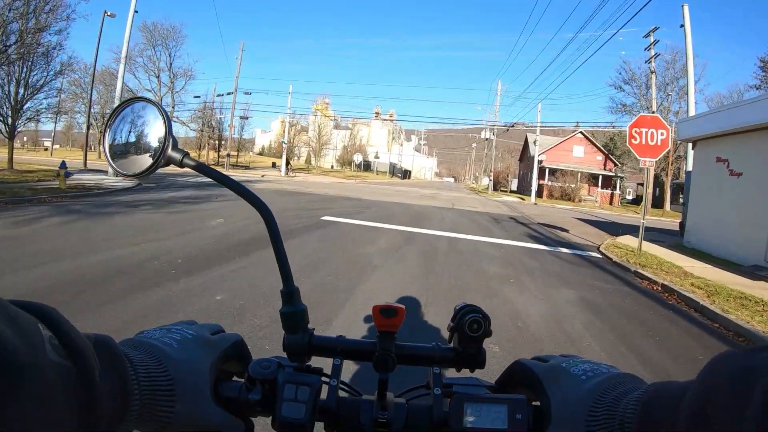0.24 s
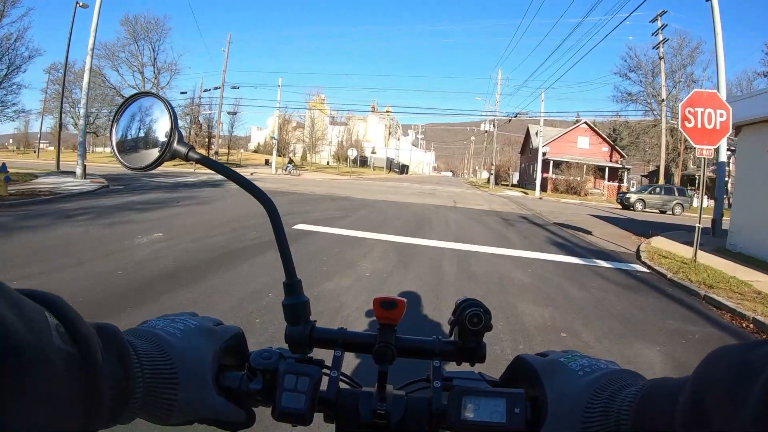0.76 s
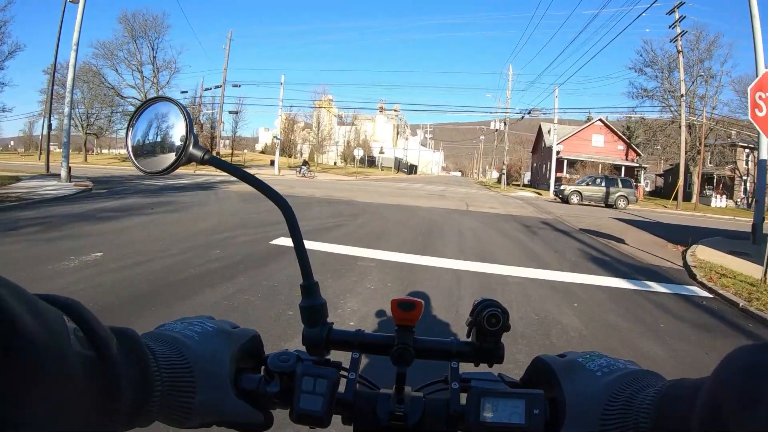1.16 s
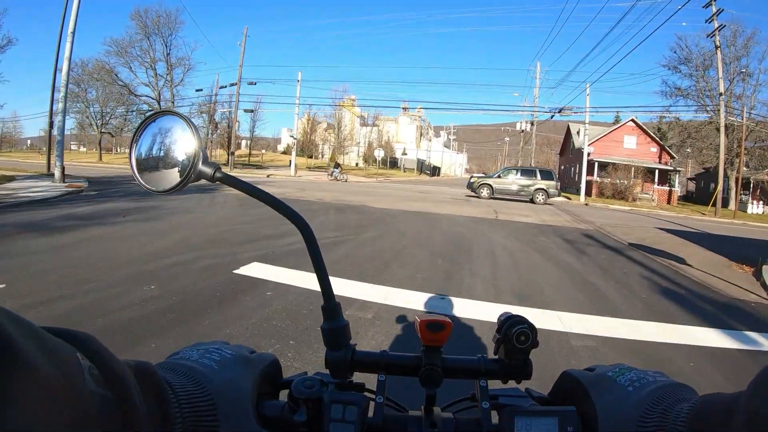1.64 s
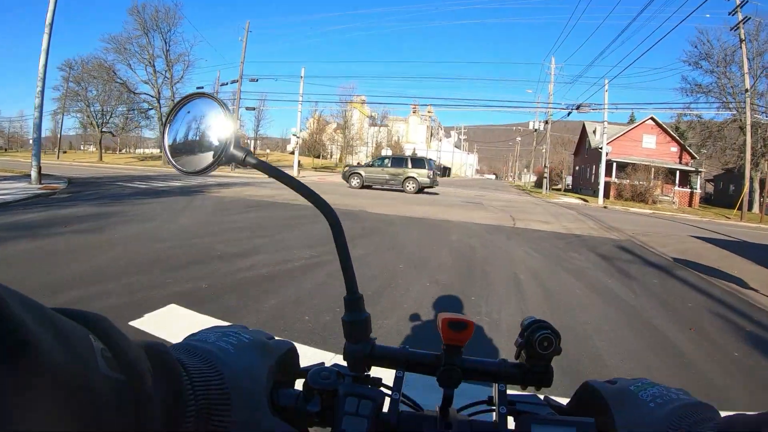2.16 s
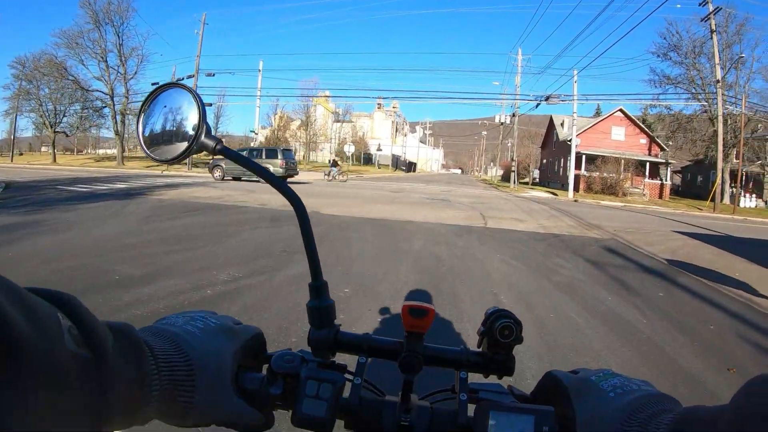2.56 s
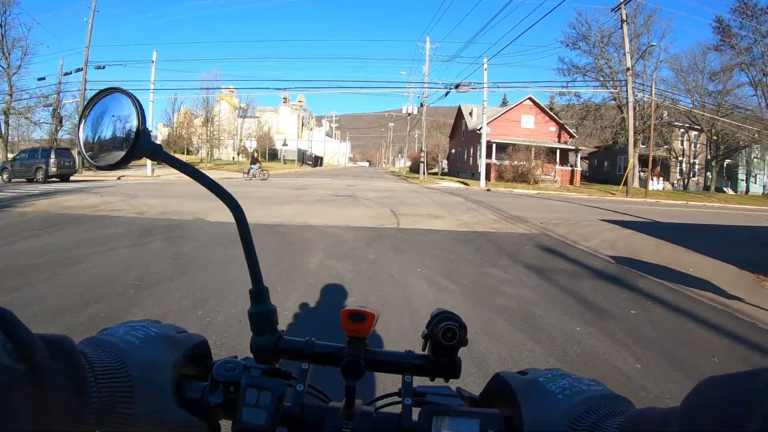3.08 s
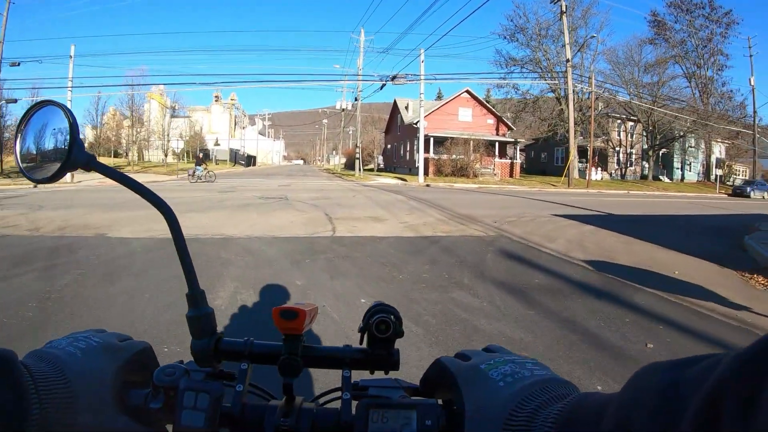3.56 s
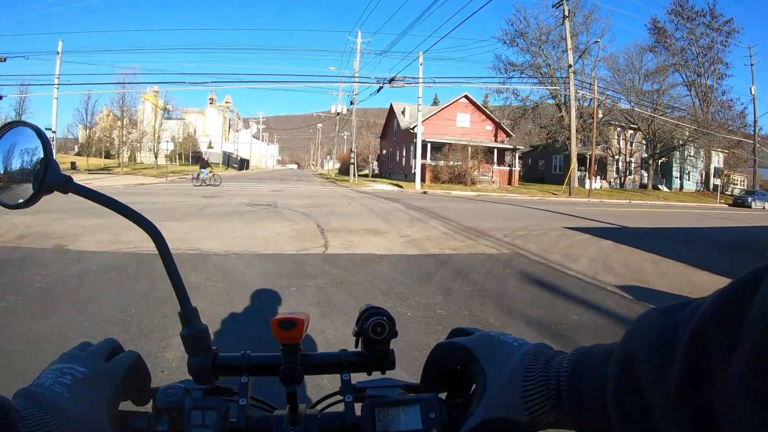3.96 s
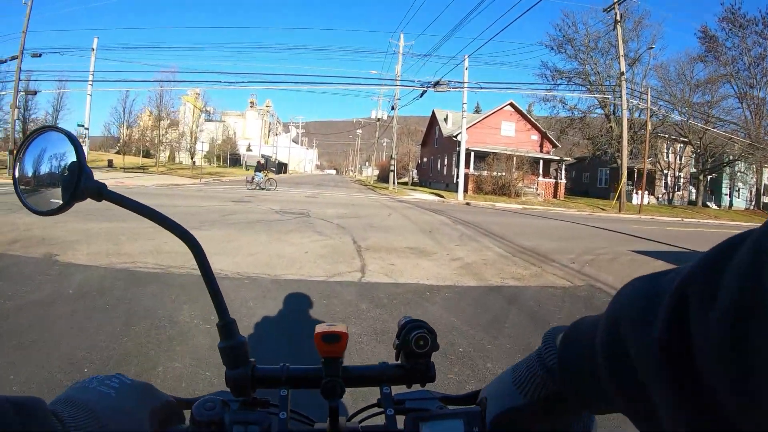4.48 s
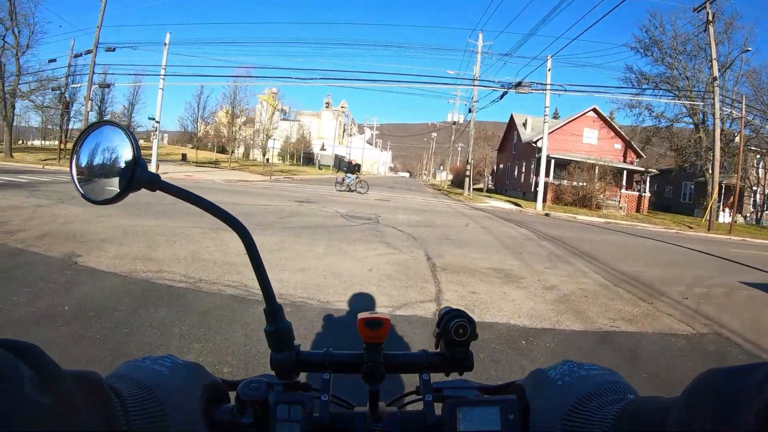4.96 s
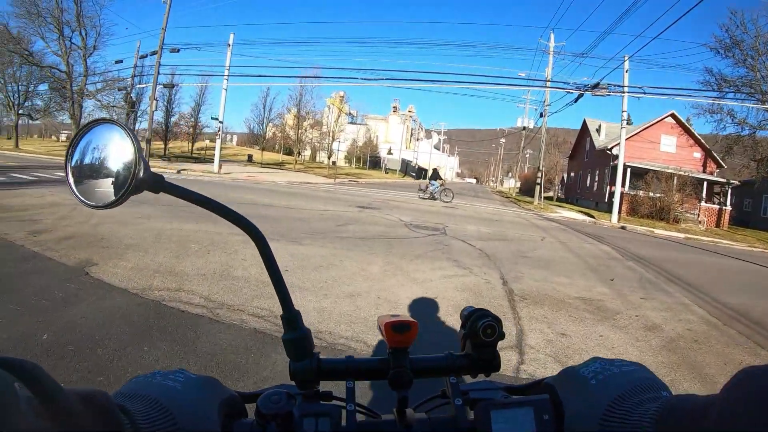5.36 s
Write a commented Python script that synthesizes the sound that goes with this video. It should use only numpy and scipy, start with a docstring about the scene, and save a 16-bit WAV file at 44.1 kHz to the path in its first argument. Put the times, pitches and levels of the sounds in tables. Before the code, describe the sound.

Gusty wind rumbles and thumps on a chest-worn microphone outdoors as an electric scooter slows, its faint whine sinking away while a low hum carries on. Stiff jacket cloth crackles close by, and traffic crosses the junction from the left to the right. Something knocks twice on the microphone's case, a plastic handlebar switch clicks several times, and one lighter knock follows as the traffic moves behind.

```python
"""At a street crossing, from the two microphone ports of a camera on an electric scooter rider's chest.
In the first second the hub motor's whine falls away as the scooter brakes to a stop. A steady hum stays on,
wind buffets the ports and the jacket rustles right beside them. Farther off, tyres rush on the left, then
cross to the right. Something knocks twice on the camera case, a handlebar switch clicks at arm's length,
and a last knock comes as the traffic moves behind."""
import sys
import numpy as np
from scipy import signal
from scipy.fft import rfft, irfft, next_fast_len
from scipy.io import wavfile
from scipy.ndimage import uniform_filter1d, map_coordinates

SR = 44100
rng = np.random.default_rng(int(sys.argv[2]) if len(sys.argv) > 2 else 0)


def unload_wav(signal):
    """Save mono or channel-first audio to the path in sys.argv[1] as 16-bit WAV at rate SR, clipped to [-1, 1]."""
    wavfile.write(
        sys.argv[1],
        SR,
        np.round(np.clip(np.atleast_2d(signal).T, -1, 1) * 32767).astype(np.int16),
    )


N = 247842


def hub_motor():
    """Down at the wheel, the motor's whine falls and fades as the scooter slows."""
    # Each row: time in seconds, pitch in Hz, level in dB.
    whine = [(0, 385.3, -25.5), (.3, 373.2, -28.5), (.65, 357.5, -33.5), (.9, 349, -37.5), (1.1, 357, -70)]
    hz, db = curves(whine)
    level = np.sqrt(2) * amp(db + 2.4 * wobble(24))
    return level * np.sin(2 * np.pi * np.cumsum(hz + 1.3 * wobble(5.9)) / SR)


def hum(start_hz=166.85, sag_hz_per_s=.1398):
    """A steady tone and its octave, the same at both ports."""
    # Each row: time in seconds, tone in dB, octave in dB.
    levels = [(0, -20.5, -31), (.3, -18.5, -30), (.45, -20, -33.5), (.6, -17, -33.5), (1.0, -15, -34),
              (1.25, -17.5, -28.5), (1.4, -15.5, -26.5), (1.6, -17.5, -30), (1.9, -21.5, -34),
              (2.05, -18, -28), (2.2, -24, -36), (2.3, -24, -38), (2.5, -20, -38), (2.75, -22.5, -37),
              (3.05, -20.5, -26.5), (3.45, -19, -33), (3.75, -17, -30), (3.93, -15.5, -34.5),
              (4.08, -21, -23.5), (4.2, -15.5, -34), (4.35, -13.5, -42), (4.6, -18, -38.5),
              (4.9, -12.5, -33.5), (5.15, -18, -40), (5.4, -15, -39), (5.62, -14, -30)]
    tone_db, octave_db = curves(levels)
    phase = 2 * np.pi * np.cumsum(start_hz - sag_hz_per_s * np.arange(N) / SR) / SR + .27 * wobble(6)
    tone = amp(tone_db + 1.32 * wobble(25) + .53 * wobble(8.1)) * np.sin(phase)
    octave = amp(octave_db + .46 * wobble(12)) * np.sin(2 * phase + .3 * wobble(15))
    return np.sqrt(2) * (tone + octave)


def airflow(flutter_db=1.5, breeze_pan_db=-.5):
    """The wind's level and pan in dB: gusts add their power to a fluttering breeze."""
    # Each row: time in seconds, breeze strength on a log scale.
    strength = [(0, -21.5), (.9, -16.5), (1.3, -27), (1.8, -21), (2.2, -21), (3, -21.5), (3.7, -19.5),
                (4.5, -25), (5, -18), (5.62, -20.5)]
    # Each row: peak time in seconds, peak in dB, rise and fall in seconds, pan in dB.
    gusts = [(.115, -12.5, 0.14, 0.12, 9.5), (.36, -18.5, 0.042, .06, 15), (.56, -17.5, 0.34, 0.13, 11),
             (.64, -22, 0.047, 0.037, 15.5), (.74, -17.5, 0.07, 0.13, 18), (.83, -25, 0.068, .05, 3),
             (1.075, -13.5, 0.036, 0.045, 6.5), (1.125, -16, 0.037, 0.067, 8.5),
             (1.285, -18, 0.02, 0.13, 10.5), (1.36, -9, 0.054, 0.029, -0.5),
             (1.42, -13.5, 0.053, 0.068, 5.5), (1.579, -11.5, 0.034, 0.15, 13.5),
             (1.78, -15.5, 0.21, 0.052, 7), (2.006, -19, 0.02, 0.034, 16), (2.055, -12, 0.018, 0.031, 9),
             (2.21, -16, 0.026, 0.068, 18), (2.285, -12, 0.11, 0.022, 18.5), (2.41, -17, 0.046, 0.033, 2),
             (3.1, -27, 0.063, .12, -4), (3.3, -17, 0.18, 0.03, 0.5), (3.41, -18, 0.03, .06, 6.5),
             (3.52, -16.5, 0.048, 0.067, 4.5), (3.91, -18, 0.14, 0.059, 2.5), (4.05, -19, 0.03, 0.11, .5),
             (4.29, -18, 0.095, 0.37, -3.5), (4.6, -15.5, 0.091, 0.085, -3.5), (4.82, -21, .08, 0.067, 3.5),
             (5.1, -26, 0.18, 0.11, -5.5), (5.24, -18.5, 0.13, .05, 6.5), (5.31, -15.5, 0.052, 0.1, 7)]
    breeze_power = amp(2.21 * (curves(strength)[0] + flutter_db * wobble(11)))
    gust_power = swells(gusts)
    power = breeze_power + gust_power.sum(axis=0)
    pan_db = (breeze_pan_db * breeze_power + np.array(gusts)[:, -1] @ gust_power) / power
    return 10 * np.log10(power), pan_db


def wind():
    """Slow pressure swells reach both ports; eddies break in lumps, most on the windward one."""
    # Spectra. Each row: frequency in Hz, relative level in dB.
    rumble_colour = [(8.8, -48), (15, -41), (37, -2), (139, -4), (150, -10), (200, -17.5), (330, -120)]
    eddy_colour = [(8.8, -28), (15, -6), (54, 5.5), (125, -3), (206, -15.5), (409, -28.5), (469, -27),
                   (617, -25.5), (900, -52.5), (1170, -70.5), (1980, -120)]
    slap_colour = [(80, -30.5), (150, -2), (250, -4), (400, -16.5), (600, -17.5), (900, -39.5), (2000, -87)]
    db, pan_db = airflow()
    shared = amp(db - .67 * np.abs(pan_db))
    windward_db = np.clip([pan_db, -pan_db], 0, None)
    extra = shared * np.sqrt(amp(2 * windward_db) - 1 + .11)
    lumps = amp(2.6 * np.array([wobble(30), wobble(30)]))
    eddies = noise(eddy_colour, channels=2)
    eddy_power = np.abs(uniform_filter1d(eddies ** 2, size=2200) + .05)
    eddies = unit(lumps * eddies / eddy_power ** .27)  # no long lulls
    slaps = 1.1 * extra * unit(lumps * noise(slap_colour, channels=2))  # stronger eddies are brighter
    return .9 * shared * noise(rumble_colour, channels=1) + extra * (eddies + slaps)


def wind_thumps():
    """A single eddy bursts on a port: a blunt push and pull with a short knock."""
    # Each row: start in seconds, level in dB, length in seconds, pan in dB.
    eddies = [(0.108, -13, 0.022, 11.5), (1.112, -10, 0.0018, 5), (1.591, -7, .014, 10),
              (2, -14, 0.0052, 20), (2.009, -9.5, 0.0077, 9), (2.019, -2.5, 0.0069, 5),
              (2.0345, -3.5, 0.0068, 6), (2.218, -10, 0.022, 13), (2.247, -9, .014, 11),
              (3.18, -16, .002, 0), (3.199, -16, 0.0021, -3), (3.269, -8, 0.0018, 0),
              (3.474, -11, 0.0014, 1), (3.488, -11, 0.0013, 0), (5.448, -18, 0.0015, 0)]
    out = np.zeros((2, N + SR))
    for s, db, length, pan_db in eddies:
        t = np.arange(round(length * SR)) / SR
        add(out, s, amp(db) * panned(np.tanh(.55 * np.sin(2 * np.pi * t / length)), pan_db))
        add(out, s + length / 2, amp(db - .5) * burst(570, width=260, t60=min(.026, 3 * length)))
    return filtered(out[:, :N], lambda hz: 1 / (1 + 1j * hz / 1800) ** 2)  # soft air gives no treble


def handlebar_switch(low_cut_hz=1900):
    """The switch squeaks as it slides; each contact cracks and rings the plastic housing."""
    # Each row: start in seconds, level and crack in dB, favoured Hz, low modes' t60 factor, pan in dB.
    clicks = [(3.6709, -5, -5.5, 3500, 0.39, -1), (3.674, -14.5, -11.5, 2640, 1.4, -1),
              (3.7887, -13, -4.5, 2310, 2.1, 2), (3.7934, -13, -11.5, 2960, 0.52, -5.5),
              (4.1794, -13.5, -7, 3470, .6, -2), (4.1824, -19.5, -8.5, 2400, 0.97, -6.5),
              (4.2255, -31, -5, 6900, .5, 0), (4.2292, -22, -13, 3310, 0.67, 0.5),
              (4.2312, -14.5, -3, 3210, 0.74, -2.5), (4.2332, -20, -7, 3500, .45, -0.5),
              (4.2371, -15.5, -7.5, 3250, 0.58, 0), (4.2411, -19, -12.5, 3300, 0.65, 3.5),
              (4.2452, -30, -10, 3260, 0.7, 3)]
    # Each row: frequency in Hz, level in dB, nominal t60 in seconds.
    modes = [(2297, 2, 0.017), (2680, 3.5, 0.01), (3180, 4.5, 0.0095), (3600, -1, 0.02), (4530, 1.5, 0.022),
             (5600, 6.5, 0.027), (6860, 1, 0.011), (9600, -17, .006)]
    # Each row: start and end in seconds, pitch in Hz, level in dB.
    squeaks = [(3.635, 3.663, 3700, -45), (3.668, 3.695, 3630, -40), (3.728, 3.76, 5960, -54)]
    out = np.zeros((2, N + SR))
    for s, db, crack_db, favoured_hz, low_factor, pan_db in clicks:
        click = np.zeros((2, round(.08 * SR)))
        for hz, mode_db, t60 in modes:
            octaves_off = min(abs(np.log2(hz / favoured_hz)), .6)
            gain = amp(mode_db + rng.normal(0, 1, (2, 1)) + (hz > 5000) * crack_db - 30 * octaves_off)
            click += gain * ring(hz, t60 * (low_factor if hz < 4000 else .6), rise=.00018)
        crack = burst(6500, width=6000, t60=.0078, apart=.76)
        crack += .58 * burst(15000, width=5000, t60=.0055, apart=.37)
        click += 2 * amp(crack_db - 2.5) * crack
        add(out, s, amp(db) * panned(click / np.abs(click).max(), pan_db))
    for start, end, hz, db in squeaks:
        add(out, start, amp(db) * stroke(start, end, hz, width=250)[None])

    def high_pass(hz):
        """The small housing gives no lows."""
        s = 1j * hz / low_cut_hz
        return (s ** 2 / (1 + 1.17 * s + s ** 2)) ** 2
    return filtered(out[:, :N], high_pass)


def camera_case(shell_hz=1630, rub_sway_hz=1320):
    """Knocks and dragging cloth sound the shell and sway the case, in opposite phase at the two ports."""
    # Each row: start in seconds, level in dB, sway in dB, its Hz, its pan in dB, tap and its pan in dB.
    knocks = [(2.2864, -11.5, 9, 1580, 0.5, 4.5, -1), (3.2059, -9, 10, 1260, 4.5, 2, 1),
              (4.624, -18, 5, 1320, 4, -7, -10)]
    # Each row: start and end in seconds, tap and sway in dB.
    rubs = [(0.025, 0.158, -38, -46), (1.485, 1.624, -33, -22), (1.508, 1.53, -25, -35),
            (2.488, 2.597, -39.5, -56), (3.194, 3.209, -28, -6.5)]
    out = np.zeros((2, N + SR))
    for s, db, sway_db, sway_hz, sway_pan_db, tap_db, tap_pan_db in knocks:
        sway = ring(sway_hz, .032, rise=.0009) + .5 * ring(890, .022)
        sway += .22 * ring(2650, .01) + .08 * ring(5900, .0092)
        tap = ring(shell_hz, .026, rise=.0018) + .54 * ring(1890, .016)
        tap += .4 * ring(1420, .03, rise=.0017) + .25 * ring(3100, .0088) + .18 * ring(6400, .0041)
        add(out, s, amp(db + tap_db) * panned(tap, tap_pan_db))
        add(out, s, amp(db + sway_db) * panned(np.array([sway, -sway]), sway_pan_db))
    for start, end, tap_db, sway_db in rubs:
        sway = amp(sway_db) * stroke(start, end, rub_sway_hz, width=200)
        tap = amp(tap_db) * stroke(start, end, shell_hz, width=140)
        add(out, start, np.array([sway + tap, .45 * tap - sway]))
    return out[:, :N]


def jacket():
    """Stiff cloth against the camera crackles, fibres tick as they let go, and single creases snap."""
    # Each row: time in seconds, level in dB.
    chafing = [(0, -86), (.44, -91.5), (.52, -68.5), (.78, -59), (1.2, -60.5), (1.35, -52.5), (1.75, -59),
               (2.25, -52.5), (2.4, -57.5), (2.8, -52.5), (3.4, -55), (3.68, -48.5), (3.72, -58),
               (4.05, -68.5), (4.2, -58), (4.4, -60), (5.3, -61.5), (5.38, -84), (5.62, -73)]
    # Each row: peak time in seconds, peak in dB, rise and fall in seconds.
    sleeve_moves = [(.26, -56, .005, .009), (.494, -52, 0.014, 0.011), (1.268, -56, 0.019, 0.052),
                    (1.52, -37.5, 0.04, 0.068), (1.533, -39.5, .02, 0.036), (1.552, -36.5, 0.036, 0.045),
                    (1.575, -40.5, .04, 0.085), (1.605, -39, 0.05, 0.029), (2.485, -47, .015, 0.072),
                    (2.53, -44, 0.05, 0.06), (2.575, -49, .05, .04), (2.66, -42.5, 0.014, 0.096),
                    (2.7, -45.5, 0.071, 0.037), (2.73, -52, 0.043, .02), (3.15, -41, 0.12, 0.12),
                    (3.21, -45, 0.066, 0.02), (3.31, -48.5, .15, 0.11), (4.136, -49, .005, 0.011),
                    (4.344, -43.5, 0.031, 0.036), (4.5, -49.5, 0.07, .05), (4.56, -53, .04, .04),
                    (4.615, -45.5, 0.066, 0.061), (4.68, -49, 0.034, .03), (4.745, -50, .02, .02),
                    (4.784, -41, 0.0044, 0.039), (4.825, -46, .04, .04), (4.868, -46, 0.04, 0.02),
                    (5.016, -50, 0.076, 0.037), (5.27, -48.5, 0.14, 0.022), (5.462, -45, 0.022, 0.017),
                    (5.562, -49, 0.022, 0.027)]
    # Each row: frequency in Hz, relative level in dB.
    cloth_colour = [(1760, -14.5), (3000, -1), (3330, -8.5), (3510, -7), (3710, -5.5), (4560, -9),
                    (5660, 0), (6890, -2), (7350, -1.5), (7980, -12.5), (8300, -9.5), (8700, -4),
                    (9200, -10.5), (10000, -17.5), (11000, -10), (12000, -14), (15000, -18.5),
                    (22000, -120)]
    # Each row: frequency in Hz, left lead in radians, likeness 0-1, pan in dB.
    from_chest = [(2500, 0, .5, 0), (3500, 0, .7, 1), (5000, 0, .45, 0), (5800, 1.2, .55, .5),
                  (6500, 3.1, .35, 7.5), (7000, 3.1, .1, 8), (7300, .5, .5, 8), (8400, -.9, .5, 10),
                  (9500, -.6, .4, 6), (11000, 0, .7, 2)]
    # Each row: start in seconds, relative level in dB, pitch in Hz, t60 in seconds, pan in dB.
    creases = [(.778, -40, 6000, 0.0097, 0), (1.3052, -28.5, 7050, 0.0089, 2.5),
               (1.521, -21.5, 7600, .0034, 6), (1.544, -27, 7300, 0.0038, 7),
               (1.568, -22.5, 7440, .0034, 3), (1.5772, -24.5, 7600, 0.0032, 1),
               (1.607, -28, 7400, .0034, -1), (2.526, -37, 8700, .0034, 8), (2.5514, -28, 8730, .0034, 10),
               (2.564, -34, 8500, .0034, 13), (2.685, -35, 8600, 0.0038, 11),
               (2.707, -35.5, 8700, .0034, 8), (2.718, -39, 8800, .0034, 6), (4.5443, -38, 8000, .0034, -4),
               (4.606, -32, 6600, 0.0037, 0), (4.7424, -37.5, 7500, .0034, -1),
               (4.785, -27, 5200, .0034, -3), (4.875, -34, 6400, .0034, 2), (5.1265, -38, 6500, .0034, 3),
               (5.2373, -35, 7500, .002, 8), (5.242, -36, 8000, .002, 5), (5.268, -30, 7200, .002, 5),
               (5.2797, -25, 6600, .002, 5.5), (5.3025, -38, 7000, .002, 8), (5.3145, -36, 6960, .003, 0.5),
               (5.5591, -32, 6550, 0.003, 13)]
    crackle = amp(1.7 * wobble(450) + 1.5 * wobble(60)) * rng.standard_normal((2, N))
    ticks = (rng.random(N) < 160 / SR) * rng.uniform(2, 10, N) * rng.standard_normal((2, N))
    cloth = unit(filtered(crackle + ticks, lambda hz: amp(along(cloth_colour, hz))))
    level = np.sqrt(amp(2 * curves(chafing)[0]) + swells(sleeve_moves).sum(axis=0))
    out = np.pad(at_ports(level * cloth, from_chest), ((0, 0), (0, SR)))
    for s, db, hz, t60, pan_db in creases:
        snap = ring(hz, t60) + .57 * burst(6500, width=4300, t60=.86 * t60)
        add(out, s, amp(db + 4.5) * panned(snap / np.abs(snap).max(), pan_db))
    return out[:, :N]


def traffic():
    """Engines drone across the crossing; tyre noise swings left, then ahead, right and behind."""
    # Each row: time in seconds, then drone, roar, tread and hiss in dB.
    levels = [(0, -29, -35.5, -38.5, -42.5), (.55, -27.5, -32, -39.5, -44.5),
              (.7, -25.5, -32, -39.5, -42.5), (.85, -26.5, -26, -39.5, -42),
              (1.1, -25.5, -26, -38.5, -41.5), (1.5, -25.5, -24, -36, -37.5),
              (1.9, -25.5, -24.5, -48, -41.5), (2.3, -24, -26, -36, -39),
              (2.65, -26.5, -27.5, -33.5, -37.5), (3, -24.5, -25, -28.5, -37),
              (3.25, -26, -27.5, -27.5, -37.5), (3.5, -25, -22.5, -26, -41), (4.2, -22, -25, -29, -42),
              (4.6, -23.5, -26.5, -32.5, -40.5), (5.1, -25, -26, -32.5, -42.5),
              (5.62, -26, -29, -39.5, -43)]
    # Each row: time in seconds, bearing (0 left, 1 ahead, 2 right, 3 behind on the right).
    route = [(0, 1.5), (.6, 0.57), (.9, 0.04), (1.5, 0.074), (2.0, 0.066), (2.5, 0.87), (2.9, 1.01),
             (3.15, 1.35), (3.45, 1.9), (4, 2.22), (4.5, 2.63), (5, 2.74), (5.62, 2.72)]
    # Spectra of the four layers, then each road's colour. Each row: frequency in Hz, relative dB.
    drone = [(60, -13), (110, -13), (200, 16.5), (300, 12), (420, 1), (700, -52.5)]
    roar = [(180, -41.5), (300, -7), (450, -1.5), (600, 0.5), (800, -3.5), (1000, -7), (1300, -16.5),
            (2000, -37), (4000, -90)]
    tread = [(500, -51.5), (800, -12), (1000, -5), (1250, -5.5), (1600, -11.5), (1900, -18.5),
             (2500, -38.5), (5000, -92.5)]
    hiss = [(880, -44), (1500, 6), (1940, 1.5), (2540, -1.5), (3850, -12), (4320, -16.5), (5790, -20.5),
            (6670, -22.5), (7370, -26.5), (9700, -32), (11000, -32.5), (14300, -68), (22000, -120)]
    left_road = [(400, 1.5), (580, -1.5), (750, 0.5), (900, 0), (1100, 0), (1400, 3), (2000, -0.5),
                 (3000, 5), (5000, 7.5)]
    road_ahead = [(400, 2.3), (600, -3.5), (750, 2), (900, -0.3), (1100, -0.5), (1300, -2), (1500, -1.5),
                  (1700, -1), (2000, -1.5), (2400, -2), (5000, -2)]
    right_road = [(400, 1), (600, -6), (750, -0.5), (900, -1), (1100, -3.5), (1300, 2.5), (1500, 0.5),
                  (1700, -7), (2000, -4.5), (2400, -2), (5000, 2.5)]
    road_behind = [(400, -1.5), (600, -1.5), (750, 3.5), (900, 2.5), (1100, 1.5), (1300, 4), (1500, 1.5),
                   (1700, 3), (2000, 2), (2400, -1), (5000, -1)]
    # Paths round the case. Each row: frequency in Hz, left lead in radians, likeness 0-1, pan in dB.
    from_left = [(400, 0, .98, 0), (600, .3, .94, -1.5), (800, .7, .6, 4), (1000, -.2, .65, 4),
                 (1500, .2, .45, 5.5), (2000, -.5, .45, 5), (2400, -.5, .8, 3), (3200, 0, .88, 2.5),
                 (5000, .8, .5, .5), (8000, 1, .25, 3.5)]
    from_ahead = [(400, -.1, .98, 0), (600, -.5, .9, -2), (800, -.4, .88, -4.5), (1100, -.5, .8, -6),
                  (1250, -1.4, .55, -3), (1400, -2.4, .45, -8), (1550, -4.2, .45, -8), (1700, -5, .75, -5),
                  (1900, -5.7, .75, -4), (2100, -6.4, .8, -1), (2800, -6.2, .75, -2), (6000, -6.6, .45, 0)]
    from_right = [(400, -.3, .98, 1), (500, -.7, .92, 0), (600, -.7, .8, -3), (800, -.5, .75, -5),
                  (950, -1, .82, -5), (1100, -2, .78, -7), (1250, -2.7, .8, -6), (1400, -3, .88, -6),
                  (1550, -3.5, .72, -5.5), (1700, -3.8, .5, -6), (1900, -5, .15, -6), (2400, -6, .4, -6.5),
                  (2800, -6.5, .5, -7), (3500, -6.2, .4, -4), (6000, -7, .3, -1)]
    from_behind = [(400, -.2, .98, 0), (500, -.6, .85, -2), (600, -.7, .85, -4.5), (800, -.6, .85, -4),
                   (950, -1.3, .85, -3.5), (1100, -2.3, .75, -2.5), (1250, -3.3, .85, 0),
                   (1400, -3.7, .8, 0), (1550, -5.3, .2, -3), (1700, -8.1, .6, -4), (1900, -9.6, .35, -1),
                   (2100, -11.6, .55, -1.5), (2400, -12.6, .55, -3), (3500, -12.6, .5, -1.5),
                   (6000, -13, .4, 0)]
    drone_db, *tyre_db = curves(levels)
    bearing = curves(route)[0]
    swell_db = .46 * wobble(11)
    drone_gain = amp(drone_db + 1.5 * wobble(11))
    out = drone_gain * (noise(drone, channels=1) + .04 * noise(drone, channels=2))
    rushes = [noise(colour, channels=2) for colour in (roar, tread, hiss)]
    sides = [(from_left, left_road), (from_ahead, road_ahead),
             (from_right, right_road), (from_behind, road_behind)]
    for place, (path, colour) in enumerate(sides):
        step = (-1) ** place  # noise runs backwards on every other side, so neighbours are unrelated
        tyres = sum(amp(db + swell_db) * rush[:, ::step] for db, rush in zip(tyre_db, rushes))
        share = np.clip(1 - np.abs(bearing - place), 0, 1)
        out += at_ports(np.sqrt(share) * tyres, path, colour)
    return out


def amp(db):
    return 10 ** (np.asarray(db) / 20)


def unit(x):
    return x / np.sqrt(np.mean(x ** 2) + 1e-20)


def along(points, hz):
    """(Hz, value) points joined on a log axis."""
    knots, values = np.transpose(points)
    return np.interp(np.log(hz + 1), np.log(knots + 1), values)


def curves(rows):
    """One value per sample for each column after the time."""
    s, *columns = np.transpose(rows)
    return [np.interp(np.arange(N) / SR, s, column) for column in columns]


def wobble(rate):
    """A smooth random curve, rate knots a second."""
    return map_coordinates(rng.standard_normal(int(N * rate / SR) + 4), [np.arange(N) * rate / SR])


def swells(rows, span_db=10):
    """Power of each event, climbing span_db over its rise time and sinking as much over its fall."""
    s, db, rise, fall = np.array(rows).T[:4, :, None]
    late = np.arange(N) / SR - s
    return amp(2 * (db - span_db * np.maximum(-late / rise, late / fall)))


def filtered(x, response, edge=4096):
    """x through a complex frequency response; both ends are mirrored to stay smooth."""
    size = next_fast_len(N + 2 * edge)
    longer = np.pad(x, ((0, 0), (edge, size - N - edge)), mode="reflect")
    return irfft(rfft(longer) * response(np.fft.rfftfreq(size, 1 / SR)), size)[:, edge:edge + N]


def noise(spectrum, channels):
    """Coloured noises of rms 1."""
    return unit(filtered(rng.standard_normal((channels, N)), lambda hz: amp(along(spectrum, hz))))


def ring(hz, t60, length=.08, rise=.00047):
    """A sine with a short rise, dying by 60 dB in t60 seconds."""
    t = np.arange(round(length * SR)) / SR
    return amp(-60 * t / t60) * np.sin(2 * np.pi * hz * t) * (1 - np.exp(-t / rise))


def burst(hz, width, t60, apart=10):
    """A dying puff of noise around one pitch, partly different at the two ports, peak 1."""
    t = np.arange(round(.08 * SR)) / SR
    puff = (rng.standard_normal(len(t)) + apart * rng.standard_normal((2, len(t)))) * amp(-60 * t / t60)
    puff = signal.lfilter(ring(hz, 2.2 / width, length=.003, rise=.00002), [1], puff)
    return puff / np.abs(puff).max()


def stroke(start, end, hz, width):
    """Rubbing noise in one resonance, swelling and fading between two times."""
    t = np.arange(round((end - start) * SR)) / SR
    rubbing = np.convolve(rng.standard_normal(len(t)), ring(hz, 1.7 / width))[:len(t)]
    return unit(rubbing) * np.sin(np.pi * t / (end - start)) ** .5


def at_ports(pair, path, colour=((100, 0), (200, 0))):
    """Two unrelated signals become left and right with the lead, likeness and pan the case gives."""
    def response(hz, side):
        lead, alike, pan_db = (along(np.array(path)[:, [0, k]], hz) for k in (1, 2, 3))
        angle = np.arccos(alike) / 2
        gain = amp(along(colour, hz) + side * pan_db / 2)
        return gain * np.exp(.5j * side * lead) * [np.cos(angle), side * np.sin(angle)]
    return np.array([filtered(pair, lambda hz: response(hz, side)).sum(axis=0) for side in (1, -1)])


def panned(x, pan_db):
    """Pan is the level of the left port over the right."""
    return x * amp([[pan_db / 2], [-pan_db / 2]])


def add(out, s, x):
    out[:, round(s * SR):round(s * SR) + x.shape[1]] += x


def gain_control(x, ceiling_db, follow_s):
    """Loud moments on either port turn both channels down, too late to save the peaks."""
    power = uniform_filter1d((x ** 2).max(axis=0), size=900)
    over_db = np.clip(10 * np.log10(np.abs(power) + 1e-12) - ceiling_db, 0, None)
    keep = np.exp(-1 / (follow_s * SR))
    return x * amp(-signal.lfilter([1 - keep], [1, -keep], over_db))


def scene():
    """Everything that reaches the two ports."""
    return (hum() + hub_motor() + wind() + wind_thumps() + traffic()
            + jacket() + handlebar_switch() + camera_case())


def record(dry, top_hz=15800):
    """The camera rides its gain and clips the strongest gusts; treble fades behind the housing."""
    # Each row: frequency in Hz, gain in dB.
    microphone = [(9800, 1.5), (11000, -13.5), (12000, -17), (16000, -21.5)]
    ridden = gain_control(dry, ceiling_db=-12, follow_s=.11)
    clipped = .92 * ridden / (1 + np.abs(ridden) ** 8) ** (1 / 8)
    fade_out = np.clip(np.arange(N)[::-1] / 130, 0, 1)
    return filtered(clipped * fade_out, lambda hz: amp(along(microphone, hz)) * (hz < top_hz))


dry = scene()
out = record(dry)
unload_wav(out)
```